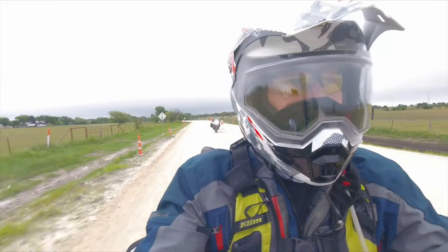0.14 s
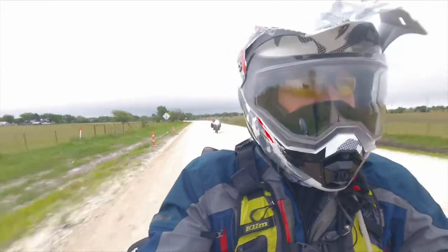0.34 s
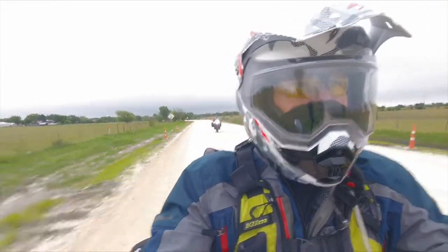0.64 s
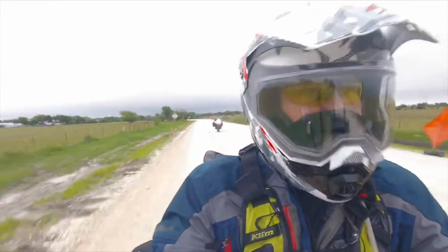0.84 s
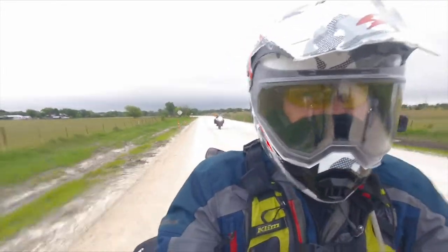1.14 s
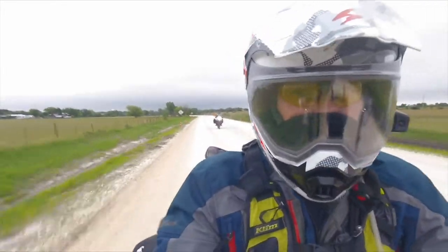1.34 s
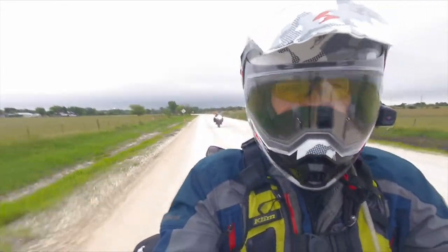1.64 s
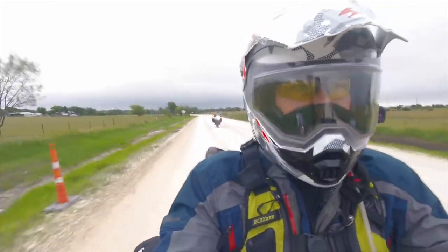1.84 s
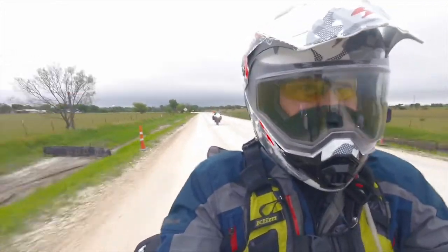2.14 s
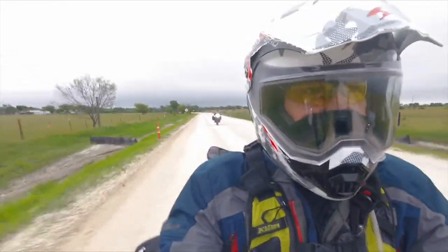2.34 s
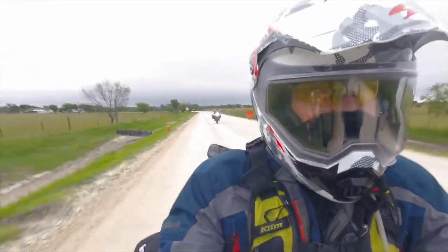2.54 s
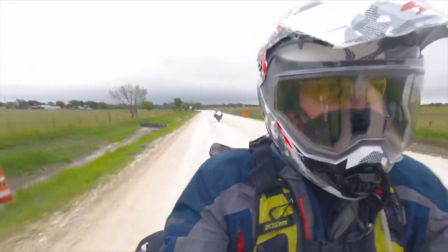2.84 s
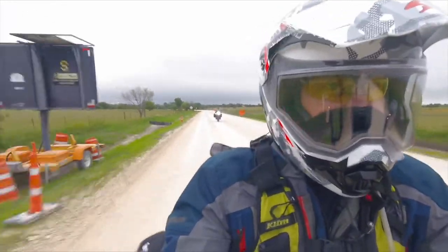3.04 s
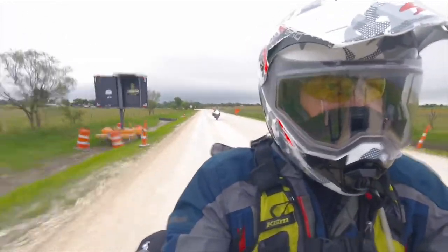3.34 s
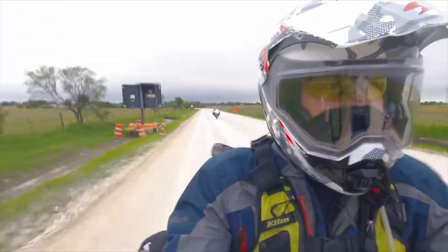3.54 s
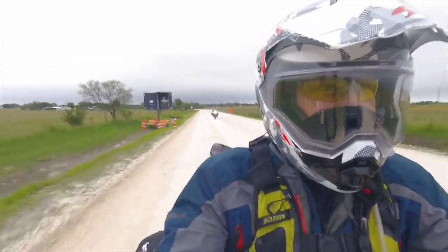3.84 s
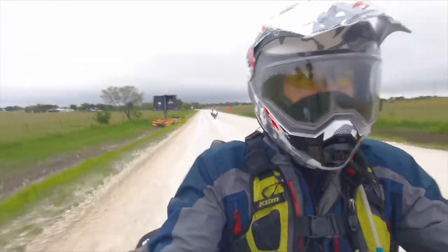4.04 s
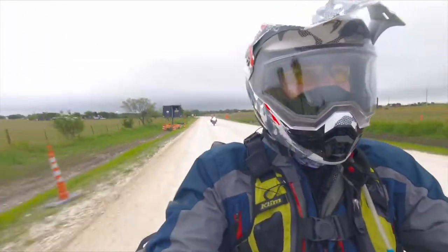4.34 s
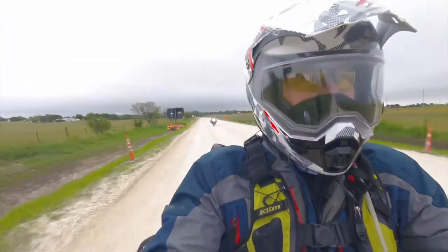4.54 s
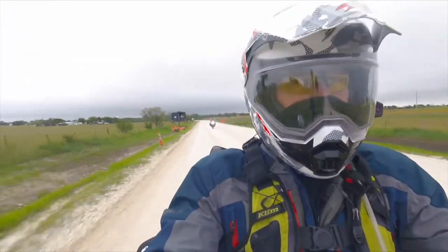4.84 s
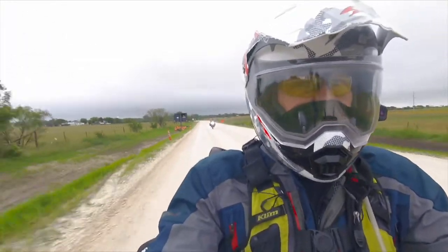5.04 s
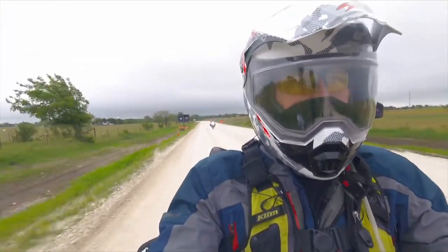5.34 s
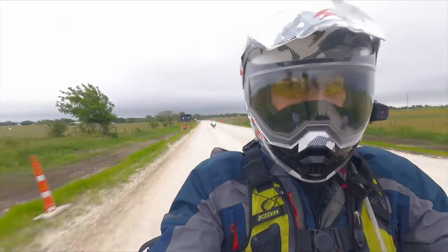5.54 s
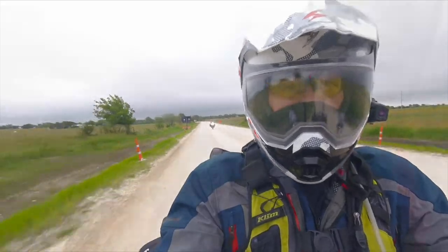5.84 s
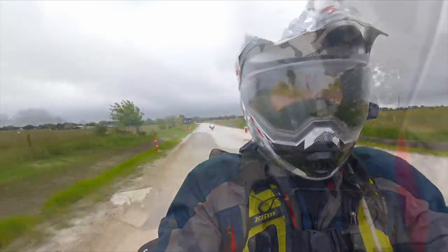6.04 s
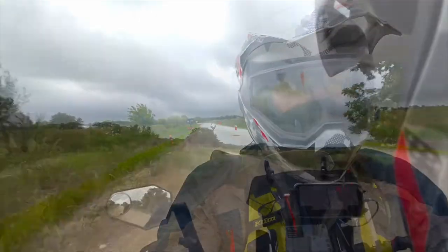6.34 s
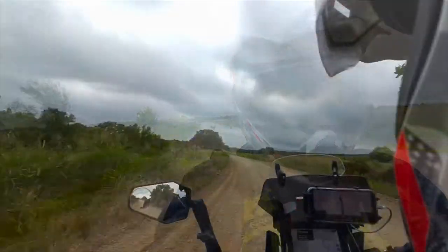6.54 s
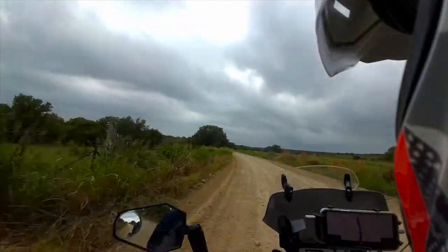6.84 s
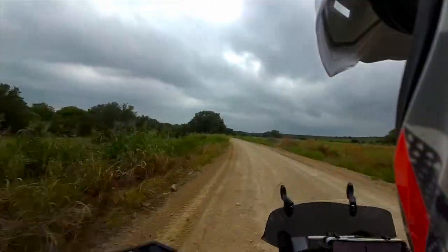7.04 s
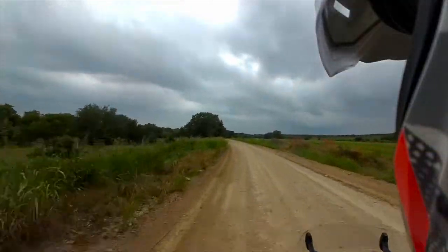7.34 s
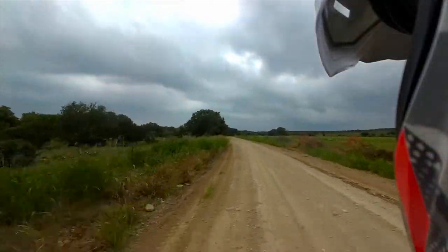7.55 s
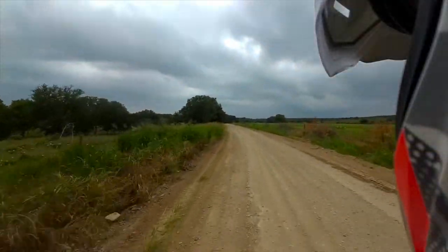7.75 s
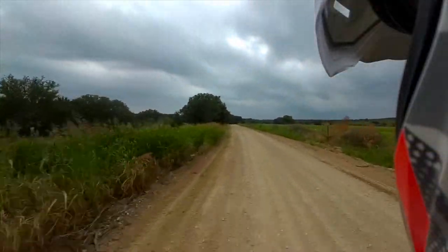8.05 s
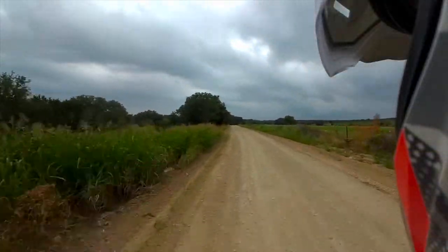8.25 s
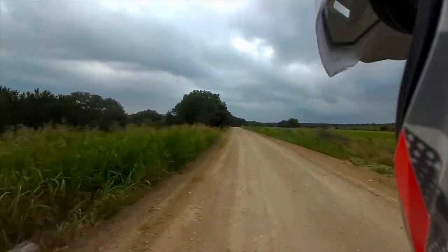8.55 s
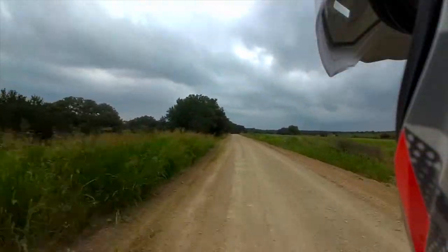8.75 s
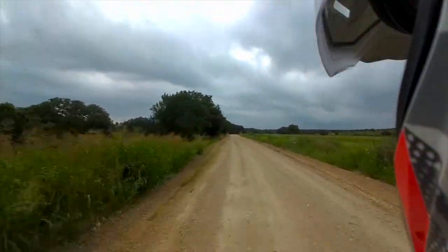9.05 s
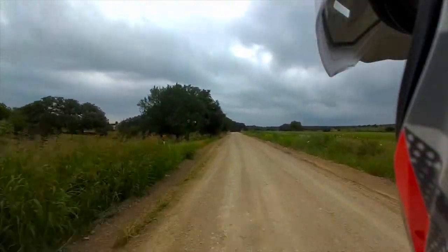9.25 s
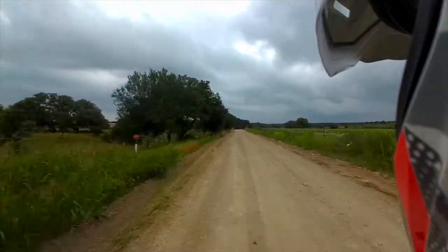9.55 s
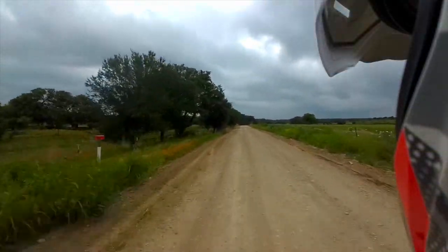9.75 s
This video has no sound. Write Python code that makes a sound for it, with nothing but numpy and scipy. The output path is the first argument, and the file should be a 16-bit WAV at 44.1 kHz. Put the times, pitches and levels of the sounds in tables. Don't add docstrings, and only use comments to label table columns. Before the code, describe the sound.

From 0 to 6 seconds, an exposed handlebar microphone on a moving motorcycle catches heavy, bassy wind buffeting, midrange flutter and occasional sharp air slaps. The twin-cylinder engine throbs beneath, begins with the throttle nearly shut, opens unevenly, then pulls strongly from about 1.2 to 3.8 seconds, its pitch rising slightly. Loose-part clicks appear mostly between 2.1 and 3 seconds, and dull engine knocks cluster around 2.6 to 3.6. Gravel hiss and sizzle swell in patches. At 4 seconds the throttle closes; pitch slowly sinks with a faint whine under wind. Between 6.1 and 6.8 the sound cross-fades to a far quieter, muffled helmet microphone. Soft lumpy gusts are strongest from about 6.8 to 8.3, over rushing air and tyre roar, with tiny bright ticks up to 7.4 and one at 8.6. From 8.4 a distant, narrow exhaust bark pulls again, rising gently until the end near 9.9.

```python
import sys
import numpy as np
from scipy import signal
from scipy.fft import rfft, irfft, next_fast_len
from scipy.io import wavfile
from scipy.ndimage import uniform_filter1d, minimum_filter1d, map_coordinates

SR = 44100
rng = np.random.default_rng(int(sys.argv[2]) if len(sys.argv) > 2 else 0)


def gain_from_decibels(decibels):
    exponent = np.asarray(decibels, float) / 20
    return 10 ** exponent


def wav_out(sig):
    wavfile.write(sys.argv[1], SR, np.round(np.clip(np.atleast_2d(sig).T, -1, 1) * 32767).astype(np.int16))


N = 436149
TIME = np.arange(N) / SR
CRUISE = 32
THUD_HZ = 585
SETTLE_S = 8.4

# (time [s], speed [engine cycles/s])
BAR_SPEED = [(0, 28.3), (.3, 28.85), (.5, 28.7), (.7, 29.25), (1, 29.9), (1.17, 30.45), (1.28, 29.75),
             (1.6, 30.5), (1.8, 30.8), (2.2, 31.8), (2.8, 33.4), (3.05, 34.1), (3.4, 35.1), (3.75, 35.8),
             (3.95, 35.9), (4.6, 35.5), (5.8, 33.4), (6.7, 32)]
# (time [s], load under full pull [dB])
THROTTLE = [(0, -33), (.2, -10.5), (.55, -15), (.9, -7.5), (1.03, -6.5), (1.17, 2.5), (1.45, 2), (1.9, 0.5),
            (2.2, -5), (2.65, 2.5), (3.1, -1.5), (3.5, 1.5), (3.76, -2), (4, -20.5), (6.8, -36)]
# (engine order, level [dB])
THROB_ORDERS = [(2, -5), (3, -1), (4, -4), (5, 0), (6, -6), (7, -9), (8, -9)]
# (frequency [Hz], lift [dB])
AIRBOX_LIFT = [(60, 0), (90, -5), (100, 2.5), (115, -1), (150, 2), (164, 1), (175, -7), (200, -2),
               (240, -3), (268, 2), (285, -8)]
# (engine order, level [dB])
NOTE_ORDERS = [(14, 1), (15, -5), (16, 0), (17, -3.5), (18, -7.5), (19, -12), (20, -13), (21, -5.5),
               (22, -4), (23, -16), (24, -6), (25, -14), (27, -14), (33, -14)]
# (frequency [Hz], lift [dB])
SILENCER_LIFT = [(415, -9), (445, 2), (468, 3), (495, 0), (545, -3), (600, 0), (645, 3.5), (672, -2),
                 (700, -4), (740, -1), (778, -1), (810, -13)]
# (engine order, level [dB])
COAST_ORDERS = [(14, -2), (15, 0), (20, -9)]
# (frequency [Hz], width [Hz], level [dB])
PIPE_MODES = [(460, 82, 1), (572, 83, -2), (663, 67, 1), (746, 250, -6), (965, 64, -6.5), (1430, 130, -14)]
# (time [s], peak level [dB])
KNOCKS = [(2.5706, -24), (2.7521, -23), (2.8419, -24), (3.021, -22), (3.051, -25), (3.197, -25),
          (3.225, -24), (3.284, -25), (3.299, -24), (3.312, -23), (3.327, -22), (3.353, -24), (3.3672, -22),
          (3.6147, -24)]
# (time [s], peak level [dB])
RATTLES = [(2.1181, -17.5), (2.149, -22), (2.1809, -28), (2.2124, -29.5), (2.4304, -18.5), (2.4604, -28.5),
           (2.5222, -31.5), (2.7651, -26.5), (2.795, -23.5), (2.9522, -32), (3.9235, -25), (4.0632, -25.5)]
# (time [s], length [s], level [dB])
BAR_GUSTS = [(.39, 0.15, 1), (.72, 0.15, 0.7), (1.3, 1, 2), (2.0, 0.35, 2.5), (2.3, 0.61, -0.5),
             (2.8, 0.23, 2.6), (3.03, 0.3, 3), (3.3, 0.23, 1.2), (4, 0.31, -1), (4.27, 0.29, 2),
             (4.55, 0.26, 1.5), (4.8, 0.43, -0.5), (4.95, 0.045, 3), (5.32, 0.25, 1.8), (5.62, 0.051, -3.5),
             (5.73, 0.047, 4), (6.07, 0.2, -2.5), (6.23, 0.073, 1)]
# (time [s], level [dB])
CROSSWIND = [(0, 3), (1, -0.5), (2.4, 2.5), (3.35, -0.5), (3.85, 4.5), (4.3, 2), (4.55, 5.5), (5.5, -3.5),
             (6.3, 2.5)]
# (frequency [Hz], density [dB per Hz])
BUFFET_SPECTRUM = [(8.8, -47), (15, -5), (156, 2.5), (198, 1.5), (260, -18), (340, -38), (570, -120)]
# (frequency [Hz], density [dB per Hz])
WHIP_SPECTRUM = [(130, -20), (220, -3), (311, -10), (362, -17), (450, -28), (580, -57.5), (990, -120)]
# (frequency [Hz], density [dB per Hz])
FLUTTER_SPECTRUM = [(240, -30), (400, -4.5), (511, -2), (574, -7.5), (785, -13.5), (1440, -16), (1550, -16),
                    (2500, -23), (3250, -41), (5500, -120)]
# (time [s], peak level [dB], pitch [Hz])
EDDY_SLAPS = [(0.7143, -16, 1400), (0.9664, -22, 1200), (1.3409, -20, 1200), (1.4754, -20, 1200),
              (1.9594, -18, 1400), (2.812, -24, 1500), (2.871, -24, 1400), (3.0031, -18, 1000),
              (3.1078, -19, 1450), (3.3393, -23, 1300), (3.3972, -22, 1400), (3.4241, -21, 1100),
              (3.4989, -18, 1900), (4.1834, -22, 1800), (4.6054, -18, 1700), (4.6494, -27, 950),
              (4.7262, -22.5, 1600), (4.9482, -21, 1050), (5.2694, -27, 1300), (5.3393, -23.5, 850),
              (5.7204, -20.5, 1300), (5.8885, -26, 1300), (6.2327, -19, 1600)]
# (time [s], length [s], level [dB])
LOOSE_GRAVEL = [(.25, .3, 0), (.75, 0.22, 2), (1.1, 0.64, 0.5), (1.6, 0.63, 1), (2.5, 0.81, 2), (3, .3, 1),
                (3.55, 0.53, -2), (4.3, 0.31, 3), (4.55, 0.14, 1.5), (4.8, .2, -1), (5.12, .15, 2),
                (5.7, .2, -1)]
# (frequency [Hz], density [dB per Hz])
HISS_SPECTRUM = [(880, -25), (1500, -5.5), (1700, -8), (2550, -3), (4300, -11.5), (5590, -43.5),
                 (9460, -120)]
# (frequency [Hz], density [dB per Hz])
SIZZLE_SPECTRUM = [(2650, -39.5), (4500, -4.5), (5410, 0), (7060, -3.5), (9870, -20), (11300, -28.5),
                   (13300, -40.5), (14900, -52), (22000, -120)]
# (time [s], speed [engine cycles/s])
HELMET_SPEED = [
    (6.2, 26.8),
    (7.3, 27.2),
    (8.05, 27.4),
    (8.4, 28.5),
    (8.55, 29.15),
    (8.75, 29.45),
    (9.2, 29.87),
    (9.89, 30.75),
]
# (time [s], level [dB])
HELMET_THROTTLE = [
    (6.2, -80),
    (7.3, -62),
    (7.65, -55),
    (8.15, -54.5),
    (8.45, -49.5),
    (8.9, -48),
    (9.89, -46.5),
]
# (frequency [Hz], width [Hz], level [dB])
FAR_PIPE_MODES = [(568, 100, 0)]
# (frequency [Hz], density [dB per Hz])
TYRE_SPECTRUM = [(740, -31), (1250, -31), (1380, -17), (1500, -0.5), (1600, 0.5), (1700, -5), (1910, -7),
                 (2590, -10), (2840, -15.5), (3540, -23.5), (6100, -29), (6680, -31.5), (7670, -39),
                 (11300, -47), (14700, -80), (22000, -120)]
# (time [s], length [s], level over the calm [dB])
HELMET_GUSTS = [(6.8, 0.1, 12), (6.97, 0.21, 10.5), (7.15, 0.18, 10), (7.35, 0.062, 9), (7.58, 0.06, 7),
                (7.81, .14, 9.5), (7.93, 0.07, 4), (8.03, .07, 5), (8.16, 0.29, 13), (8.36, 0.09, 8),
                (8.49, 0.04, 7), (8.6, .03, 6), (8.75, .05, 3), (8.92, .1, 4), (9.3, 0.48, 6), (9.6, .2, 4),
                (9.75, .08, 6)]
# (frequency [Hz], density [dB per Hz])
GUST_SPECTRUM = [(15, -71), (25, -62), (68, -2.5), (97, 2.5), (171, 1), (264, -2), (442, -3), (487, -3.5),
                 (537, -2), (700, -10), (910, -31), (1540, -120)]
# (frequency [Hz], density [dB per Hz])
AIR_SPECTRUM = [(120, -40), (200, -13), (360, -4), (450, -6.5), (560, -12), (700, -7), (1000, -8),
                (1400, -13), (1820, -46), (3080, -120)]
# (time [s], peak level [dB], pitch [Hz])
TICKS = [
    (6.561, -44, 6000),
    (6.784, -50, 4120),
    (6.832, -52, 5800),
    (7.0044, -52, 6490),
    (7.1761, -52, 3840),
    (7.436, -58, 5680),
    (8.5974, -53, 3570),
]
# (time [s], level [dB])
HELMET_FADE = [
    (6.1, -47),
    (6.4, -3.5),
    (6.75, -5),
    (7.15, 1),
]


def throb_level(load_db):
    return -13.7 + 0.55 * load_db


def engine(speed, phase, load_db):
    throb = orders(THROB_ORDERS, speed, phase, AIRBOX_LIFT, unsteady_db=1.5)
    note = orders(NOTE_ORDERS, speed, phase, SILENCER_LIFT, unsteady_db=1.2)
    whine = orders(COAST_ORDERS, speed, phase, SILENCER_LIFT, unsteady_db=2.5)
    shut = np.clip((-15 - load_db) / 10, 0, 1)
    gas = (1 + 0.46 * np.cos(4 * np.pi * phase)) * rng.standard_normal(N)

    def pipe(f):
        band = 1 + (400 / (f + 1)) ** 8 + (f / 2500) ** 4
        return resonances(PIPE_MODES)(f) / band

    roar = unit(filtered(gas, pipe))
    part = np.exp(-(2 * (TIME - 0.75) / 1.0) ** 6) * np.sin(2 * np.pi * 19 * phase)
    sound = still_air() * gain_from_decibels(throb_level(load_db)) * throb
    sound += gain_from_decibels(-28 + load_db) * note
    sound += gain_from_decibels(-43.5) * shut * whine
    sound += gain_from_decibels(-36.5 + 0.5 * load_db) * roar
    return sound + gain_from_decibels(-35.5) * part


def knocks():
    s, db = np.transpose(KNOCKS)
    ring = snaps(s, db + 1.5, 1410, cycles=1.8)
    return ring + snaps(s, db + 4, THUD_HZ, cycles=1)


def bracket_rattles():
    s, db = np.transpose(RATTLES)
    return snaps(s + 0.001, db - 3, 5450, cycles=4)


def buffeting(load_db, faster, gust_db, eddies):
    lumps_db = 0.35 * eddies + 0.45 * wobble(30)
    power = np.abs(gain_from_decibels(-11) ** 2 - 0.91 * gain_from_decibels(throb_level(load_db)) ** 2)
    buffet = rush(BUFFET_SPECTRUM, patchy_db=-0.82, lumps_db=lumps_db)
    buffet = still_air() * gain_from_decibels(gust_db) * np.sqrt(power) * buffet
    whip_db = -27 + 1.34 * faster + 1.57 * gust_db + curves(CROSSWIND)[0] + 1.5 * wobble(7)
    whip = gain_from_decibels(whip_db) * rush(WHIP_SPECTRUM, patchy_db=1.85, lumps_db=0.34 * lumps_db)
    return buffet + whip


def flutter(load_db, faster, gust_db, eddies):
    level_db = -31.5 + 0.11 * load_db - 0.81 * faster + 0.79 * gust_db
    lumps_db = 0.5 * eddies + 0.45 * wobble(60)
    return gain_from_decibels(level_db) * rush(FLUTTER_SPECTRUM, patchy_db=1.0, lumps_db=lumps_db)


def eddy_slaps():
    s, db, hz = np.transpose(EDDY_SLAPS)
    slap = snaps(s + 0.001, db + 5, hz, cycles=1)
    return slap + snaps(s, db + 6.5, THUD_HZ, cycles=1)


def road_hiss(phase, load_db, faster, gust_db, eddies):
    road_db = swells(LOOSE_GRAVEL)
    clatter_db = 0.66 * np.cos(4 * np.pi * phase)
    hiss_db = -39.5 + 0.18 * faster + 0.078 * load_db + 0.28 * gust_db + road_db
    lumps_db = 0.085 * eddies + 0.29 * wobble(40) + clatter_db
    hiss = gain_from_decibels(hiss_db) * rush(HISS_SPECTRUM, patchy_db=0.5, lumps_db=lumps_db)
    sizzle_db = -43 + 0.49 * faster + 0.14 * load_db + 0.46 * road_db
    lumps_db = 0.19 * eddies + 0.37 * wobble(70) + clatter_db
    sizzle = gain_from_decibels(sizzle_db) * rush(SIZZLE_SPECTRUM, patchy_db=1.0, lumps_db=lumps_db)
    return hiss + sizzle


def handlebar():
    speed, load_db = curves(BAR_SPEED)[0], curves(THROTTLE)[0]
    gust_db, faster = swells(BAR_GUSTS), speed - CRUISE
    phase = np.cumsum(speed) / SR
    eddies = wobble(14)
    sound = engine(speed, phase, load_db) + knocks() + bracket_rattles()
    sound += buffeting(load_db, faster, gust_db, eddies)
    sound += flutter(load_db, faster, gust_db, eddies) + eddy_slaps()
    fade = np.clip((6.788 - TIME) / 0.65, 0, 1)
    treble_fade = np.maximum(fade, 1e-3) ** -0.1
    sound += road_hiss(phase, load_db, faster, gust_db, eddies) * treble_fade
    return sound * fade ** 2.12


def far_exhaust():
    blows = firings(curves(HELMET_SPEED)[0], jitter_s=0.00005, scatter_db=1.8)

    def pipe(f):
        band = 1 + (480 / (f + 1)) ** 16 + (f / 625) ** 20
        return resonances(FAR_PIPE_MODES)(f) / band

    return gain_from_decibels(curves(HELMET_THROTTLE)[0]) * unit(filtered(blows, pipe))


def tyre_roar():
    level_db = -48 + 1.2 * (TIME - SETTLE_S) + 0.6 * wobble(8)
    return gain_from_decibels(level_db) * rush(TYRE_SPECTRUM, patchy_db=0.0, lumps_db=0.33 * wobble(25))


def helmet_wind():
    gust_db = swells(HELMET_GUSTS)
    lumps_db = 0.74 * wobble(30) + 2.6 * wobble(100)
    gusts = gain_from_decibels(-52 + gust_db) * rush(GUST_SPECTRUM, patchy_db=0.9, lumps_db=lumps_db)
    air_db = -47 + 0.8 * (TIME - SETTLE_S) + 0.077 * gust_db + 1.8 * wobble(8)
    air = gain_from_decibels(air_db) * rush(AIR_SPECTRUM, patchy_db=-0.2, lumps_db=0.37 * wobble(30))
    return gusts + air


def ticks():
    s, db, hz = np.transpose(TICKS)
    return snaps(s, db, hz, cycles=6)


def helmet():
    sound = far_exhaust() + tyre_roar() + helmet_wind() + ticks()
    sound = filtered(sound, lambda f: 1 / (1 + (50 / (f + 1)) ** 3))
    return sound * gain_from_decibels(curves(HELMET_FADE)[0]) * (TIME > 6)


def still_air():
    return gain_from_decibels(swells([(0.512, 0.028, -10)]))


def orders(table, speed, phase, colour, unsteady_db):
    step = 12
    hz, lift_db = np.transpose(colour)
    total = 0
    for order, db in table:
        gain_db = unsteady_db * wobble(3.18)[::step] + np.interp(order * speed[::step], hz, lift_db)
        angle = 2 * np.pi * (order * phase[::step] + rng.random())
        total = total + gain_from_decibels(db + gain_db) * np.sin(angle + 0.15 * wobble(6)[::step])
    return unit(signal.resample_poly(total, step, 1)[:N])


def firings(speed, jitter_s, scatter_db):
    phase = np.cumsum(speed) / SR
    cycles = np.arange(1, int(phase[-1]))
    chance = rng.standard_normal((400, 2))[:len(cycles)]
    at = np.interp(cycles, phase, TIME) + jitter_s * chance[:, 0]
    place = np.clip(np.round(at * SR).astype(int), 0, N - 1)
    return np.bincount(place, gain_from_decibels(scatter_db * chance[:, 1]), N)


def snaps(s, db, hz, cycles):
    out, t = np.zeros(N + SR), np.arange(SR // 20) / SR
    for at, size, f in np.broadcast(s, gain_from_decibels(db), hz):
        shape = (1 - np.exp(-6 * t * f)) * np.exp(-t * f / cycles)
        out[round(at * SR):][:len(t)] += size * np.sin(2 * np.pi * f * t) * shape
    return out[:N]


def rush(spectrum, patchy_db, lumps_db):
    z = signal.stft(rng.standard_normal(N), nperseg=512)[2]
    field = uniform_filter1d(rng.standard_normal(z.shape), size=6, axis=0)
    field = uniform_filter1d(field, size=10, axis=1)
    noise = signal.istft(z * gain_from_decibels(patchy_db * unit(field)), nperseg=512)[1][:N]
    f, level = np.transpose(spectrum)

    def colour(hz):
        return gain_from_decibels(np.interp(np.log(hz + 1), np.log(f + 1), level))

    return unit(filtered(noise * gain_from_decibels(lumps_db), colour))


def resonances(modes):
    def response(f):
        total = 0
        for k, (centre, width, db) in enumerate(modes):
            damping = 1j * f * width
            total = total + (-1) ** k * gain_from_decibels(db) * damping / (centre ** 2 - f * f + damping)
        return total

    return response


def filtered(x, response):
    m = next_fast_len(N + SR // 2)
    return irfft(rfft(x, m) * response(np.fft.rfftfreq(m, 1 / SR)), m)[:N]


def swells(rows):
    coarse = TIME[::32]
    total = sum(db * np.exp(-(2 * (coarse - s) / length) ** 4) for s, length, db in rows)
    return np.interp(TIME, coarse, total)


def wobble(rate):
    coarse = TIME[::32]
    knots = rng.standard_normal(int(N * rate / SR) + 4)
    return np.interp(TIME, coarse, map_coordinates(knots, [coarse * rate]))


def curves(rows):
    s, *cols = np.transpose(rows)
    return [np.interp(TIME, s, c) for c in cols]


def unit(x):
    return x / np.sqrt(np.mean(x ** 2) + 1e-20)


def scene():
    return (handlebar() + helmet())[None]


def band_limit(x):
    return signal.sosfilt(signal.butter(12, 14900, fs=SR, output="sos"), x)


def record(dry):
    x = dry + gain_from_decibels(-82.0) * rng.standard_normal(dry.shape)
    need = np.minimum(1, 0.9 / (np.abs(x) + 1e-9))
    held = minimum_filter1d(need, size=601, axis=1)
    mix = x * uniform_filter1d(held, size=300, axis=1)
    return band_limit(mix)


dry = scene()
out = record(dry)
wav_out(out)
```